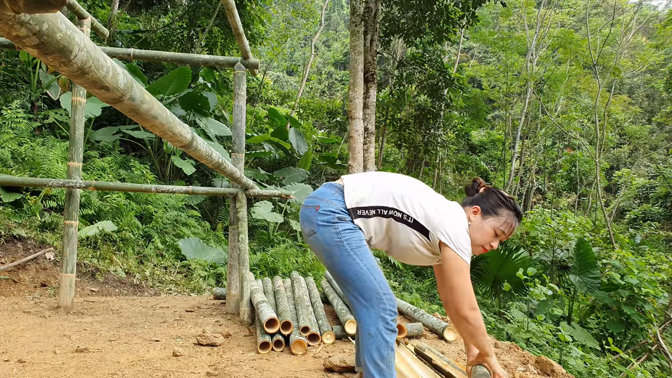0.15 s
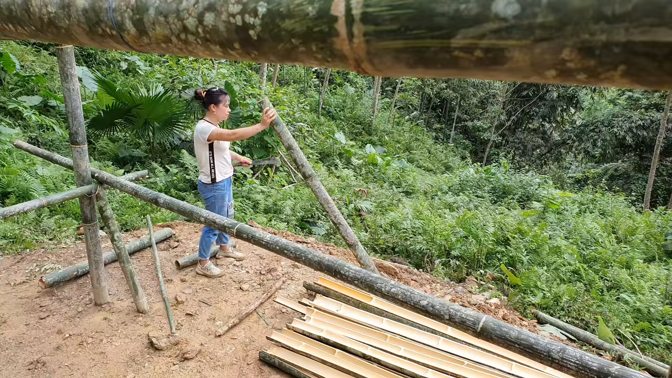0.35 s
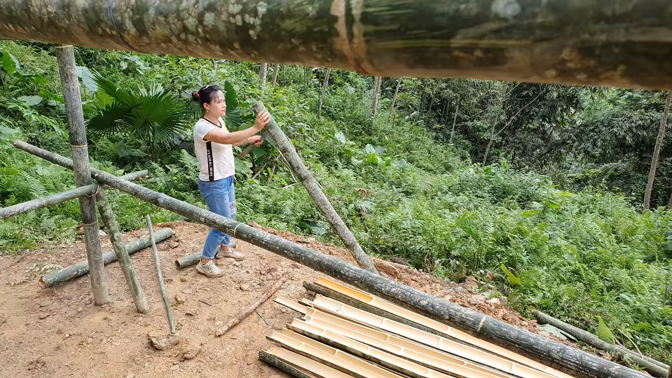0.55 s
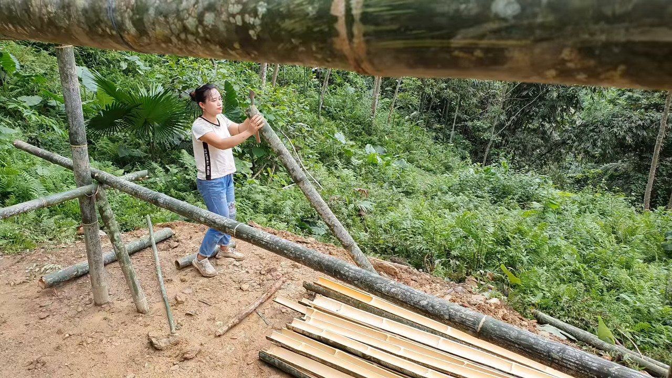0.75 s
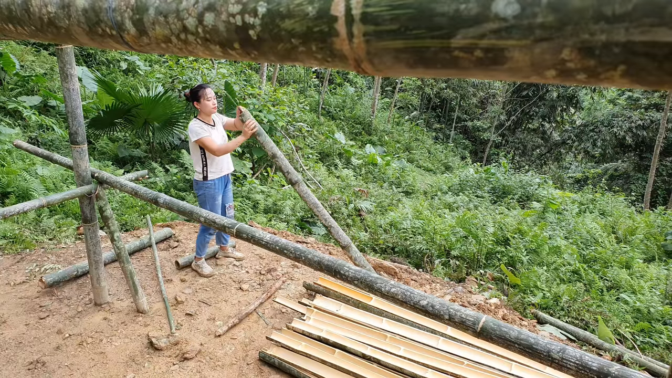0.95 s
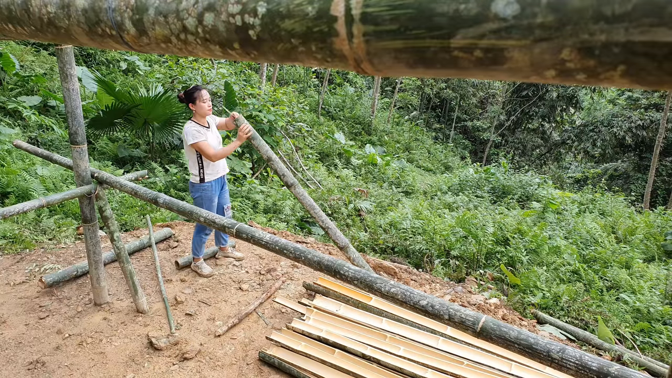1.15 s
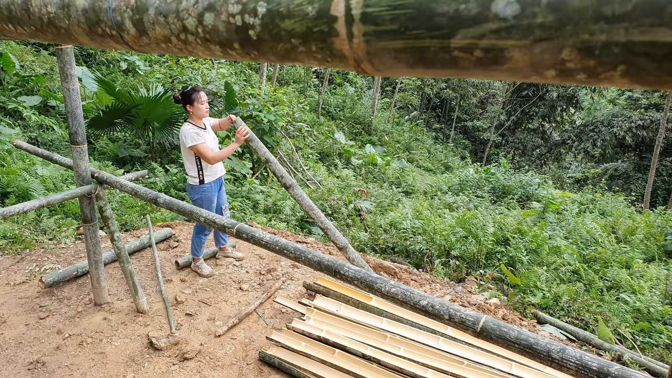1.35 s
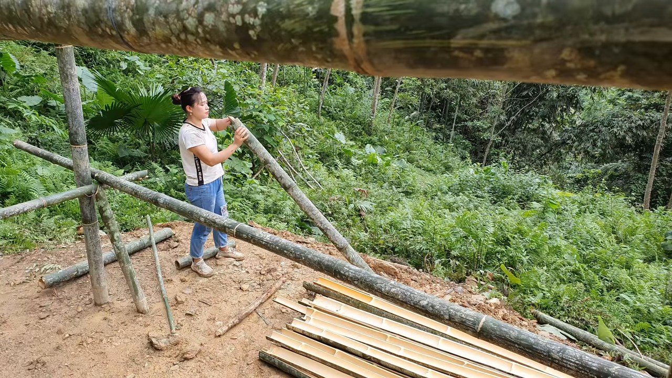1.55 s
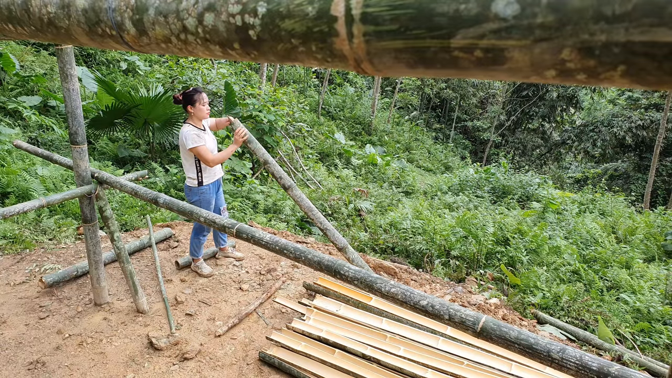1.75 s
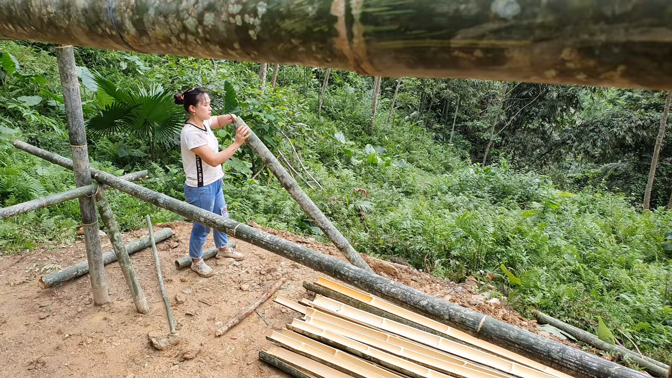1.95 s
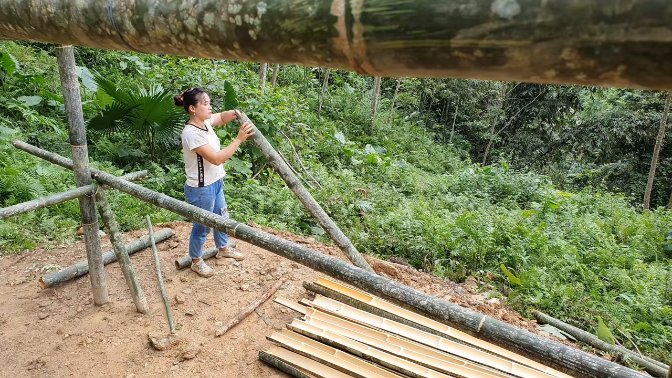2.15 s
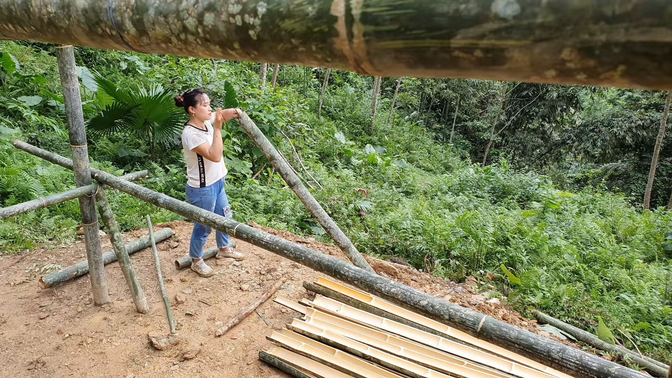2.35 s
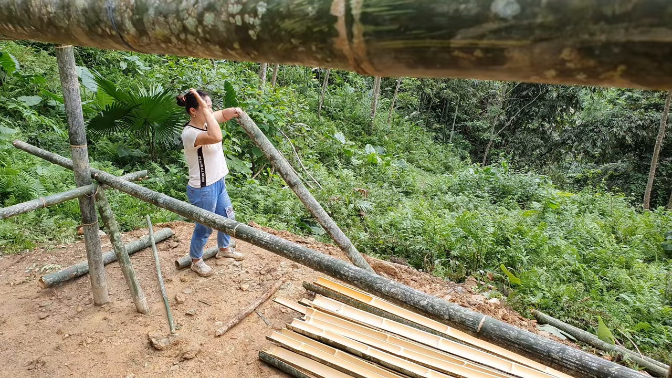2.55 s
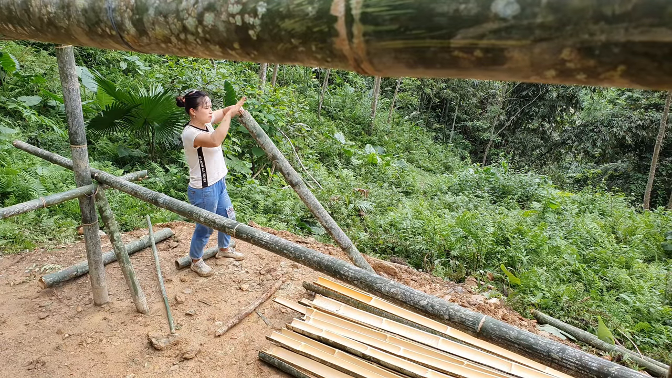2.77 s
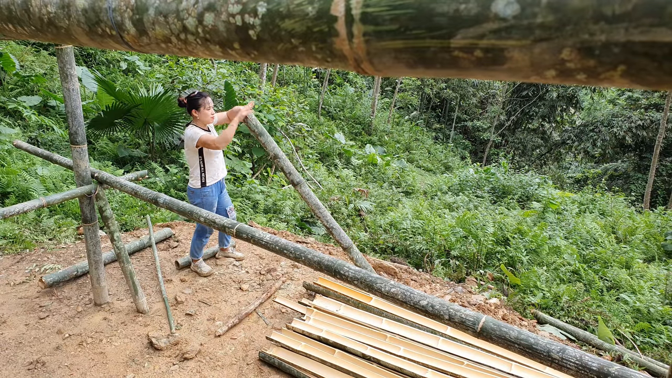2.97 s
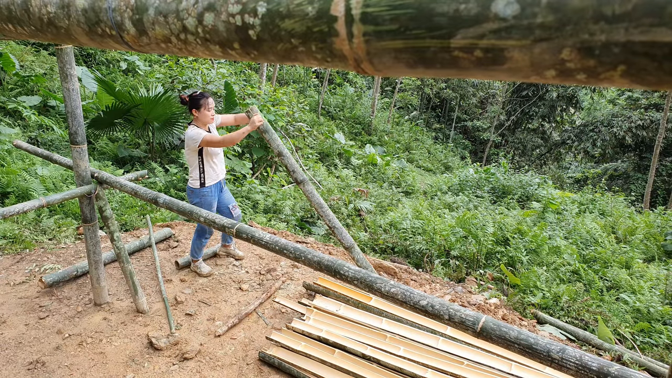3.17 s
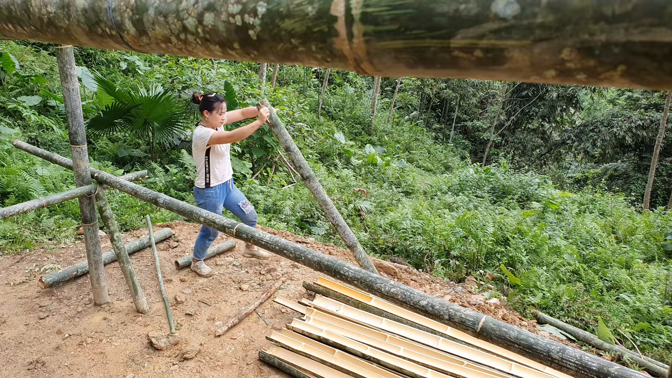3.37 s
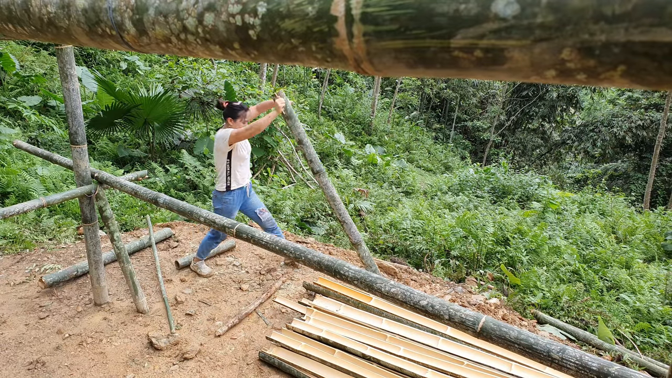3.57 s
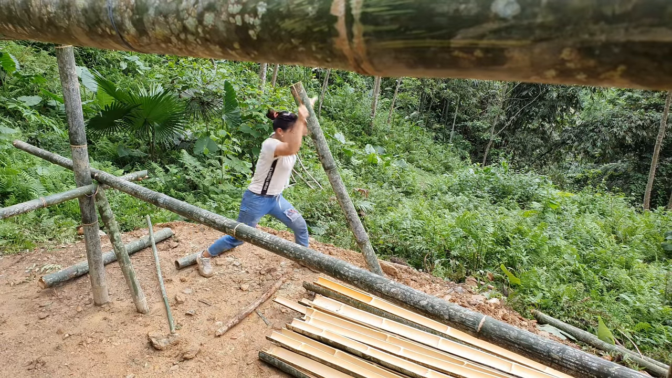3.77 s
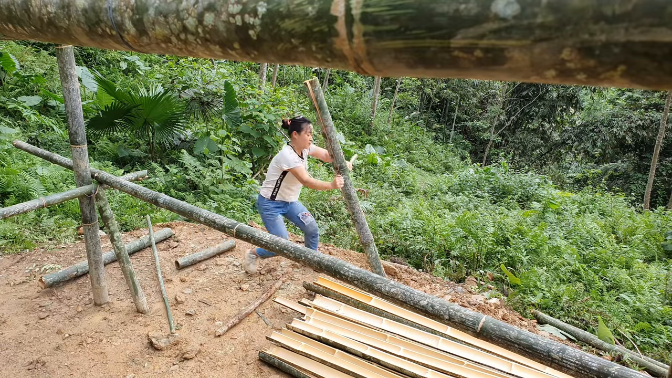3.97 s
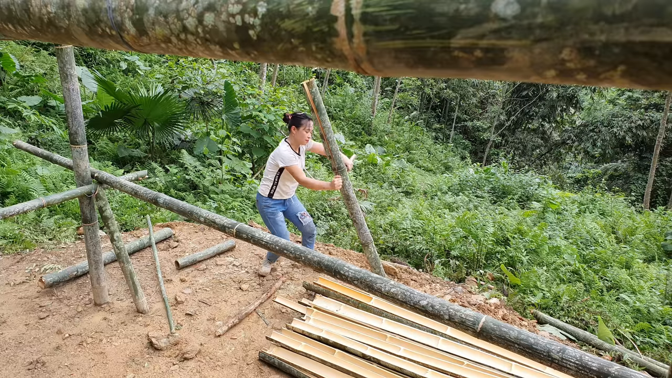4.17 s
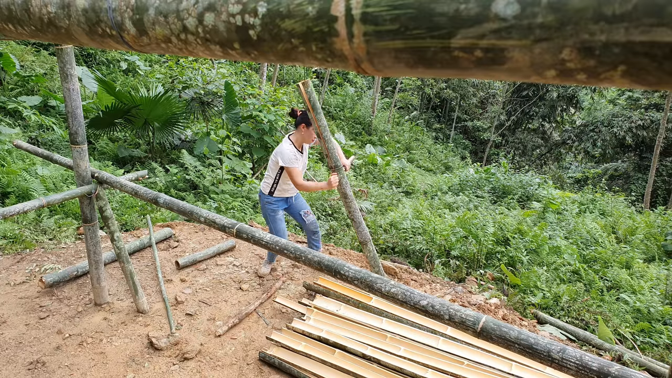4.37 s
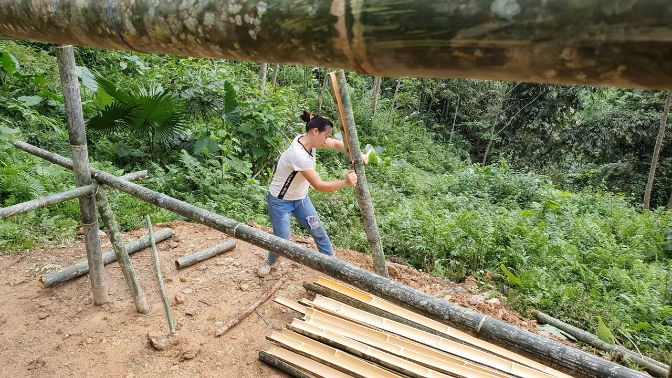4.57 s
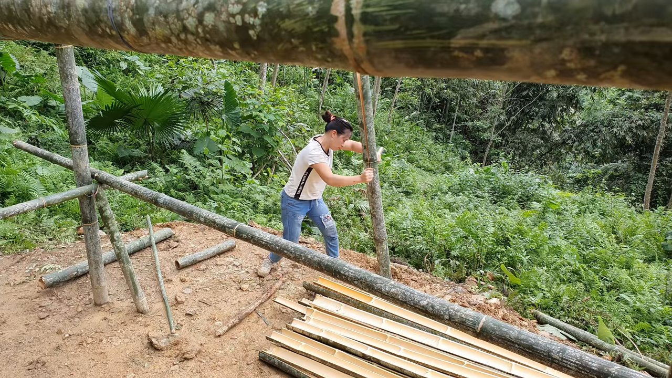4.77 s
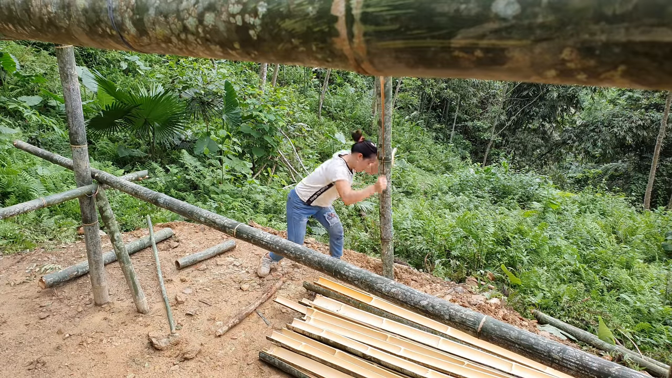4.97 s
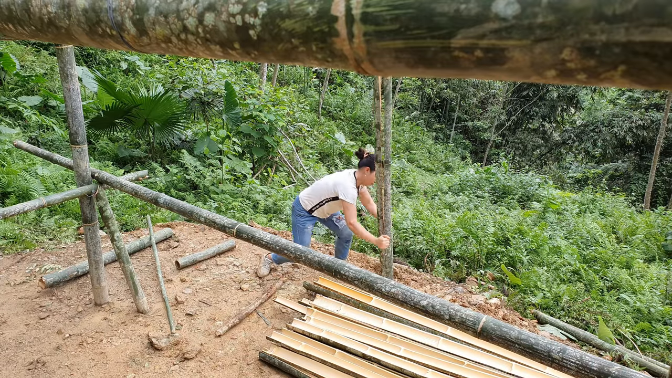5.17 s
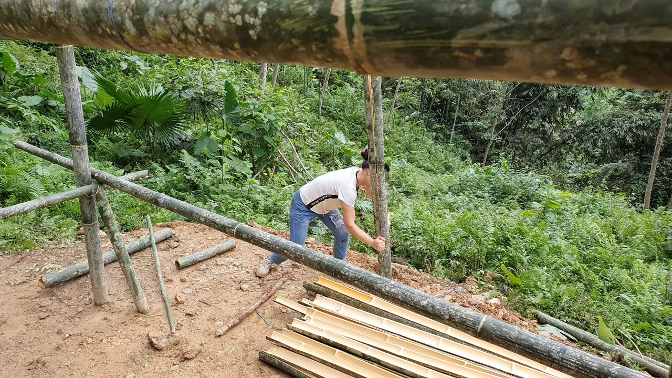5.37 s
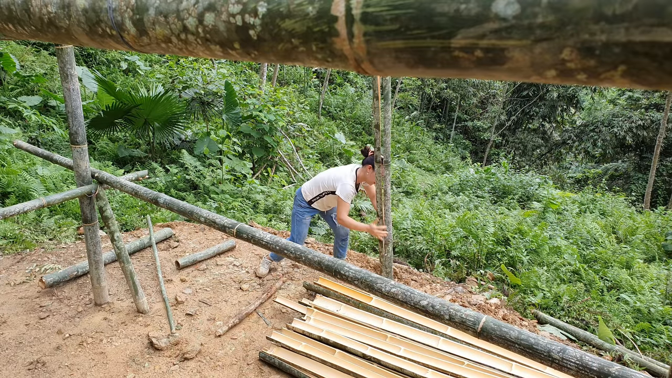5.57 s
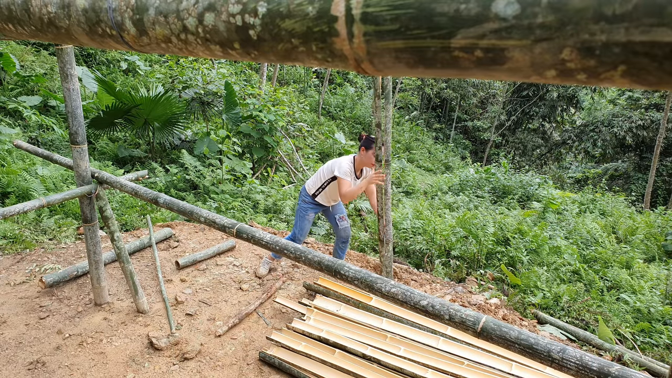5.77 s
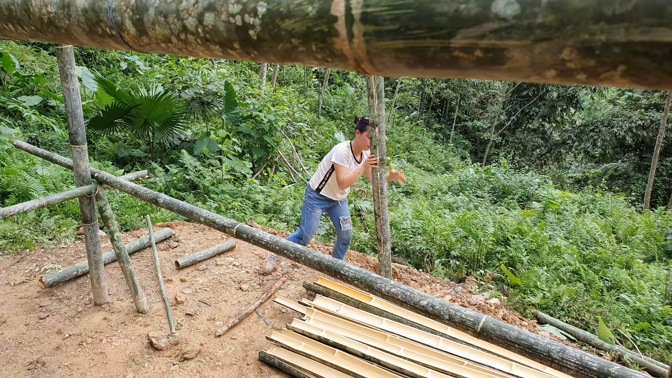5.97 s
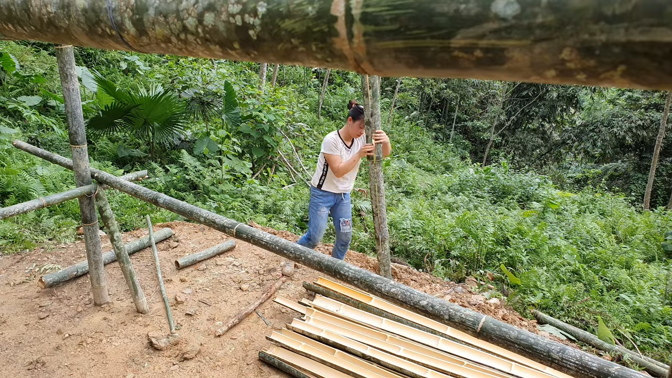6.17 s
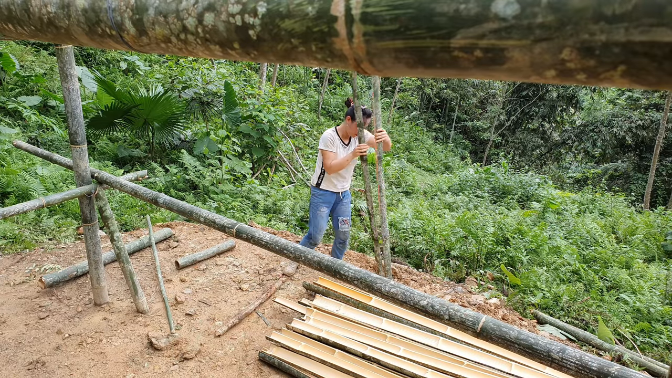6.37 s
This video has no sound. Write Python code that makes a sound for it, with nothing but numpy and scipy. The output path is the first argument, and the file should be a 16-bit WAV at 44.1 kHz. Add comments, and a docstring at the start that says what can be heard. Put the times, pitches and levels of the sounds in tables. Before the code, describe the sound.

A sharp, nearby clatter of bamboo poles opens, with two lighter clicks just after. Faint dull footsteps and brief hollow scrapes lead to two heavy thuds about a second apart, as a pole is driven into crunchy soil a little way from the microphone. Softer knocks trail off as it settles. The surrounding trees scatter the thuds back, and a quiet, high buzz of crickets and insects continues throughout.

```python
"""Two crickets and a chorus of insects buzz on a wooded slope. A bamboo pole clatters off a pile, footsteps
and pole thump dully on the ground, and a thin cane taps twice. The pole's hollow tube rings as it is
stood on end. It is rammed twice into a post hole, near 4 s and 5 s: its foot scrapes through gritty soil
and lands with a thud. A few light bumps follow. Throughout, the trees scatter the pole's sounds back."""
import sys
import numpy as np
from scipy import signal
from scipy.fft import rfft, irfft, next_fast_len
from scipy.io import wavfile
from scipy.ndimage import uniform_filter1d

SR = 44100
rng = np.random.default_rng(int(sys.argv[2]) if len(sys.argv) > 2 else 0)


def output_pcm(signal):
    """Save a mono or channel-first signal as 16-bit PCM at the path in sys.argv[1].

    Samples are clipped to [-1, 1] before scaling.
    """
    pcm = np.clip(np.atleast_2d(signal).T, -1, 1) * 32767
    wavfile.write(sys.argv[1], SR, np.round(pcm).astype(np.int16))


N = 283122
TIME = np.arange(N) / SR
AGE = np.arange(int(.8 * SR)) / SR  # seconds into a one-shot


def undb(db):
    """Decibels to gain."""
    return 10 ** (np.asarray(db) / 20)


def unit(x):
    """Scale to an rms of one."""
    return x / np.sqrt(np.mean(x ** 2))


def fade(t60, t=AGE):
    """Exponential decay, 60 dB down after t60 seconds."""
    return np.exp(-np.log(1000) * t / t60)


def walk(rate, size):
    """Smooth random drift with a spread near one."""
    hold = max(int(SR / rate), 1)
    stairs = np.repeat(rng.standard_normal(size // hold + 1), hold)
    return 1.6 * uniform_filter1d(stairs, hold)[:size]


def eq_gain(points, hz):
    """Gain of an EQ curve at the given frequencies."""
    f, db = np.transpose(points)
    return undb(np.interp(np.log(hz + 1), np.log(f), db))


def add(track, s, sound):
    """Mix a sound into a track at s seconds."""
    start = max(int(s * SR), 0)
    track[:, start:start + sound.shape[1]] += sound[:, :N - start]


# stereo width of scattered sound: f/Hz, side over mid/dB
STEREO_WIDTH = [(60, -19.5), (250, -12), (740, -10), (1100, -1.5), (2500, -2), (8000, 2.5), (15000, -1.5)]
def noise(spectrum, size, source=None):
    """Coloured stereo noise at unit rms: narrow in the bass, wide in the treble."""
    source = rng.standard_normal((2, size)) if source is None else source
    order = next_fast_len(size)
    hz = np.fft.rfftfreq(order, 1 / SR)
    mid, side = irfft(rfft(source, order) * eq_gain(spectrum, hz), order)[:, :size]
    side = irfft(rfft(side, order) * eq_gain(STEREO_WIDTH, hz), order)[:size]
    return unit(np.array([mid + side, mid - side]))


def ring(modes, pitch, gains, crest_s=0):
    """Damped modes, lined up at the crest of the blow; higher ones reach the two sides out of step."""
    out = 0
    for (hz, db, t60), gain in zip(modes, gains):
        skew = np.arctan(eq_gain(STEREO_WIDTH, hz)) * rng.choice([-1, 1]) * np.array([[1], [-1]])
        out = out + gain * undb(db) * fade(t60) * np.sin(2 * np.pi * hz * pitch * (AGE - crest_s) + skew)
    return out


def pulsing_cricket(hz=7435, pulse_s=.0054, droop_hz=35, waver_hz=25, between=.13):
    """One wing stroke after another, each a short, nearly pure and slightly falling tone."""
    period, first_s = 1 / 25, .022
    offset = (TIME - first_s + period / 2 + .0007 * walk(3.2, N)) % period - period / 2
    stroke = np.exp(-(offset / pulse_s) ** 2) * undb(1.7 * walk(25, N))
    pitch = hz - droop_hz * np.tanh(offset / pulse_s) + waver_hz * walk(200, N)
    phase = 2 * np.pi * np.cumsum(pitch) / SR
    return unit(np.array([(stroke + between * walk(120, N)) * np.sin(phase + lag) for lag in (0, 1.3)]))


def chirping_cricket(top_hz=6100, sweep_hz=1000, left_gain=.65):
    """Chirps of six quick strokes, each sweeping downwards, at a slightly uneven pace."""
    period, first_s, stroke_s, strokes, uneven = .1396, .066, .0102, 6, .05
    cycle = (TIME - first_s) / period + uneven * walk(2, N)
    count = cycle % 1 * period / stroke_s
    envelope = np.sin(np.pi * count) ** 2 * (count < strokes) * (.72 + .33 * count / strokes)
    pitch = top_hz - sweep_hz * (count % 1) + 110 * walk(300, N)
    phase = 2 * np.pi * np.cumsum(pitch) / SR
    return unit(np.array([left_gain * envelope * np.sin(phase), envelope * np.sin(phase + 2.2)]))


# fader rides of the ambience: t/s, bed level/dB, pulsing cricket level/dB
AMBIENCE_RIDES = [(0.0, -55, -63), (0.64, -68, -74), (0.97, -68, -74), (2.23, -56, -62), (3.65, -56, -62),
                  (3.97, -53, -59), (4.29, -61, -67), (6.42, -59, -67)]
# sizzle of the far insects: f/Hz, level/dB
CHORUS_EQ = [(3300, -37), (3900, -13), (4350, -7), (4850, -9.5), (5400, -2.5), (5950, -5), (6500, -16.5),
             (7050, -6), (7450, 5.5), (7900, -7), (8500, -8), (8900, -15), (9850, -2.5), (10800, -25.5),
             (15500, -30.5)]
# low wash of moving air: f/Hz, level/dB
AIR_EQ = [(15, -42), (25, -13), (54, -8), (182, -6), (299, -8), (345, -2.5), (416, -10), (742, -3),
          (992, -13.5), (1500, -11), (3500, -21), (4550, -53), (7700, -120)]
def hillside(chorus_db=1.5, chirp_db=-5, pulse_db=3, air_db=-13, flicker_db=.5, right_db=4):
    """Two near crickets and a blur of far insects, mostly from the brush on the right, over faint air."""
    s, *rides = np.transpose(AMBIENCE_RIDES)
    bed_fader, pulse_fader = (undb(np.interp(TIME, s, ride)) for ride in rides)
    chorus = noise(CHORUS_EQ, N) * undb(chorus_db + flicker_db * walk(140, N))
    air = bed_fader * noise(AIR_EQ, N) * undb(air_db + walk(6, N))
    chirps = undb(chirp_db) * chirping_cricket()
    pulses = undb(pulse_db) * pulsing_cricket()
    pan = undb(np.array([[-right_db], [right_db]]) / 2)
    return (bed_fader * (chorus + chirps) + pulse_fader * pulses) * pan + air


# hits of the pole against the pile: t/s, level/dB, treble shelf/dB
PILE_HITS = [(.006, -39.5, 0), (.062, -46, 1), (.0935, -20.5, 1.5), (.1005, -15.2, -2.5),
             (.123, -20.5, -13), (.152, -26.5, -4.5), (.205, -41.5, -16), (.25, -51, 1), (.381, -45.5, -12)]
# wall modes of the piled poles: f/Hz, level/dB, t60/s
PILE_WALLS = [(556, -10, .08), (825, -1, .1), (922, -3, 0.21), (1124, -0.5, 0.11), (1327, -5, 0.14),
              (1774, -9, .1), (2176, -11, 0.044), (2870, -9.5, 0.044)]
# woody clack of the rattle: f/Hz, level/dB
CLACK_EQ = [(50, -24), (220, -13), (330, -19), (550, -2.5), (850, -5), (1600, -7.5), (3200, -14),
            (6000, -21), (10000, -30), (15000, -41)]
def pile_clatter(treble_hz=2200, ring_db=-6.5, pitch_scatter=.022, crack_t60=.068, t60_per_db=.0068):
    """Hard knocks: the tube walls ring and the neighbouring poles rattle."""
    out = np.zeros((2, N))
    hardest_db = max(row[1] for row in PILE_HITS)
    polarity = (-1) ** np.arange(len(PILE_WALLS))
    for s, db, treble_db in PILE_HITS:
        # the hardest knock is a dry crack; lighter ones leave the pile rattling for longer
        rattle = noise(CLACK_EQ, len(AGE)) * fade(crack_t60 + t60_per_db * (hardest_db - db))
        treble = signal.sosfilt(signal.butter(1, treble_hz, "high", fs=SR, output="sos"), rattle)
        walls = ring(PILE_WALLS, 1 + pitch_scatter * rng.standard_normal(), polarity)
        add(out, s, undb(db) * (rattle + (undb(treble_db) - 1) * treble + undb(ring_db) * walls))
    return out


# dull low thumps on the ground, from footsteps and the pole: t/s, level/dB
THUMPS = [(.01, -61), (.259, -55), (2.328, -63), (3.188, -52), (3.308, -61), (3.366, -52.5), (4.071, -60)]
# low-end weight of the ground: f/Hz, level/dB
GROUND_EQ = [(20, -5), (48, -5), (75, -5), (130, -22.5), (300, -32), (1000, -66)]
def ground_thumps(press_s=.016, knock_db=-40, ring_db=-20, landing_db=-44):
    """Dull pushes on the ground from the feet and from the pole's knocks, rings and landings."""
    out = np.zeros((2, N))
    push = AGE / press_s * np.exp(1 - AGE / press_s)
    layers = (THUMPS, 0), (PILE_HITS, knock_db), (TUBE_HITS, ring_db), (LANDINGS, landing_db)
    for cues, trim_db in layers:
        for s, db, *_ in cues:
            add(out, s, undb(db + trim_db) * noise(GROUND_EQ, len(AGE)) * push)
    return out


# two taps of a thin cane: t/s, level/dB
CANE_HITS = [(0.4042, -28.5), (.4385, -31.5)]
# wall modes of the cane: f/Hz (before tuning), level/dB, t60/s
CANE_WALLS = [(802, -9.5, 0.066), (1133, -5, 0.058), (1249, -4, 0.076), (1824, -15, .06),
              (2450, -12, 0.074), (2570, -6, 0.035), (2830, -9, 0.043), (3060, -9, 0.044)]
# bright tick of the contact: f/Hz, level/dB
TICK_EQ = [(100, -18), (500, -14), (800, -4), (1200, -3), (1700, -8), (2800, -6), (4200, -11), (7000, -17),
           (15000, -35)]
def cane_taps(contact_s=.0017, tick_db=-7, tick_t60=.092, tuning=.97):
    """A lighter, higher clack: a tick of contact and a short hollow ring from the walls."""
    out = np.zeros((2, N))
    polarity = (-1) ** np.arange(len(CANE_WALLS))
    for s, db in CANE_HITS:
        tick = undb(tick_db) * noise(TICK_EQ, len(AGE)) * fade(tick_t60)
        walls = ring(CANE_WALLS, tuning, polarity)
        add(out, s, undb(db) * (tick + walls) * (1 - np.exp(-AGE / contact_s)))
    return out


# the pole shifting and catching: t/s, level/dB, upper mode trim/dB, catch spacing/s
TUBE_HITS = [(1.503, -59, -21, .02), (2.73, -37, -2, .0091), (3.034, -43.5, 2.5, .035)]
# one bending mode, the air column's odd series, then wall modes: f/Hz, level/dB, t60/s
TUBE_PARTIALS = [(145.7, 4, 0.59), (392, -15, .25), (659, 16.5, 0.13), (960, 8, 0.13), (1150, -6, .12),
                 (1490, 4, 0.11), (2040, 2.5, .08), (2665, 5, 0.086), (3170, -2.5, 0.054),
                 (3806, -7.5, 0.098), (4400, 6, 0.1)]
def tube_rings(build_s=.014, catch_s=.004, catch_db=-3.5, catches=2):
    """The long pole bends and its air column sounds; further catches ring only the upper modes."""
    out = np.zeros((2, N))
    is_upper = np.arange(len(TUBE_PARTIALS)) > 0
    for s, db, upper_db, spacing_s in TUBE_HITS:
        body = ring(TUBE_PARTIALS, 1, undb(upper_db * is_upper)) * (1 - np.exp(-AGE / build_s))
        add(out, s, undb(db) * body)
        for k in range(1, catches + 1):
            catch = ring(TUBE_PARTIALS, 1, is_upper) * (1 - np.exp(-AGE / catch_s))
            add(out, s + k * spacing_s, undb(db + upper_db + k * catch_db) * catch)
    return out


# crunch of the soil: f/Hz, level/dB
GRIT_EQ = [(60, -19), (200, -5), (700, -10), (1300, 3.5), (1900, -1.5), (3200, -1), (5200, -6), (7500, -9),
           (11000, -12), (15500, -22)]
def grit(grain_db=1.5):
    """Crushed soil: a dense run of grains of uneven size."""
    sizes = undb(grain_db * np.clip(walk(1500, len(AGE)), -2, 2))
    return noise(GRIT_EQ, len(AGE), rng.standard_normal((2, len(AGE))) * sizes)


# the pole's foot sliding: t/s, length/s, rasp level/dB, grit level/dB, swell/dB, air gap f/Hz
SLIDES = [(2.726, .033, -33, -27.5, 0, 195), (3.03, .088, -29.5, -29, -8, 205),
          (3.845, .096, -26.5, -27.5, 1.5, 290), (3.975, .066, -27, -38, -11, 315),
          (4.532, .08, -43, -43, -6, 320), (5.071, .074, -35.5, -38.5, 7, 355),
          (5.197, .09, -42.5, -38, -6, 240), (5.567, .052, -39, -43.5, -9, 355)]
# hollow rasp through the tube: f/Hz, level/dB
RASP_EQ = [(150, -40.5), (330, -14.5), (430, -13), (520, -4.5), (610, -7.5), (700, -2.5), (790, -3.5),
           (930, -12.5), (1200, -19.5), (1900, -25.5), (4000, -43.5)]
def soil_scrapes(grip_s=.007, judder_db=1.46, gap_waver=.05, gap_rise_per_s=1.8):
    """Soil sticks and slips, rasping through the tube; the air gap round the foot rises in pitch."""
    snug_hz, snug_db, gap_db_per_octave = 290, -4, 18
    run_on_t60, run_on_per_s = .025, .75
    rim_s, rim_db = .028, -17
    out = np.zeros((2, N))
    for s, length, rasp_db, grit_db, swell_db, gap_hz in SLIDES:
        travel = np.minimum(AGE / length, 1) - .5
        # loose soil runs on for longer after a longer slide
        release_t60 = run_on_t60 + run_on_per_s * length
        force = (1 - np.exp(-AGE / grip_s)) * fade(release_t60, np.maximum(AGE - length, 0))
        force *= undb(swell_db * travel + judder_db * walk(160, len(AGE)))
        hz = gap_hz * (1 + gap_rise_per_s * length * travel) * (1 + gap_waver * walk(150, len(AGE)))
        gap_tone = unit(np.sin(2 * np.pi * np.cumsum(hz) / SR) * (1 + .93 * walk(110, len(AGE))))
        # a narrower, higher gap speaks louder, up to the pitch of a snug fit
        gap_db = rasp_db + snug_db + gap_db_per_octave * min(np.log2(gap_hz / snug_hz), 0)
        rasp = undb(rasp_db) * noise(RASP_EQ, len(AGE))
        add(out, s, force * (rasp + undb(grit_db) * grit() + undb(gap_db) * gap_tone))
        if swell_db > 0:  # a stroke that gathers speed brushes the rim just before it grips
            envelope = np.minimum(AGE / rim_s, 1) * fade(release_t60, np.maximum(AGE - rim_s, 0))
            brush = noise(RASP_EQ, len(AGE)) + gap_tone + grit() / 2
            add(out, s - rim_s, undb(rasp_db + rim_db) * envelope * brush)
    return out


# body of pole and hole together: f/Hz (at pitch ratio 1), level/dB, t60/s
HOLE_MODES = [(112.9, -10.5, 0.063), (167.8, -9.5, 0.047), (213.7, -0.5, 0.075), (249, 0.5, 0.037),
              (308, -2, 0.12), (508, -5, .08), (604.3, -2, 0.074), (682, 1, 0.071), (734, -4, .05),
              (811, -11, 0.083), (1124, -20, .12), (1401, -18, 0.11)]
def thud(db, pitch, bass_db, crunch_db, bass_edge_hz=420, give_s=.0044, give_s_per_db=.00007):
    """The soil gives way for a moment, crunches, and the pole answers with a short hollow note."""
    is_bass = np.array(HOLE_MODES)[:, 0] < bass_edge_hz
    note = ring(HOLE_MODES, pitch, undb(bass_db * is_bass), crest_s=.004175)
    knock = undb(-14) * noise(RASP_EQ, len(AGE)) * fade(t60=.2)
    crunch = undb(crunch_db) * grit() * fade(t60=.094)
    attack_s = give_s + give_s_per_db * abs(db)  # lighter landings sink in more slowly
    return undb(db) * ((note + knock) * (1 - np.exp(-AGE / attack_s)) + crunch)


# the pole's foot hitting soil: t/s, level/dB, pitch ratio, bass trim/dB, crunch trim/dB
LANDINGS = [(3.478, -48, 1.21, -25, -22), (3.85, -14.5, 1.02, -8.5, -10), (3.9425, -3.3, .99, -15, -14),
            (4.015, -21.5, 1.04, -4, -20), (4.53, -28.5, 1.01, -15, -3), (4.741, -55, 1.3, 2, -30),
            (5.155, -6.2, 1.01, -2.3, -7.5), (5.195, -26, 1.1, 5.5, -15), (5.642, -36.5, 1.14, 0, -21),
            (5.947, -49, .92, -8, -21), (6.302, -39.5, 1.09, 2.5, -28), (6.33, -43, .84, -5, -22)]
def pole_landings(settle_s=.021, settle_db=-22.5, settle_pitch=.82, settle_bass_db=4):
    """The foot lands, then settles with a second, weaker and deeper thud."""
    out = np.zeros((2, N))
    for s, db, pitch, bass_db, crunch_db in LANDINGS:
        add(out, s, thud(db, pitch, bass_db, crunch_db))
        add(out, s + settle_s, thud(db + settle_db, pitch * settle_pitch, settle_bass_db, crunch_db))
    # a high-pass keeps sub-bass rumble out of the thuds
    return signal.sosfilt(signal.butter(2, 55, "high", fs=SR, output="sos"), out)


# reverb bands of the wood: f/Hz, level/dB, t60/s
REVERB_BANDS = [(100, 0, 0.79), (280, -1, .8), (646, -4, 1.156), (1300, -5.5, 0.98), (3000, 4.5, 0.75),
                (7000, 1, .7), (13280, 7, 0.49)]
def tree_reverb(send, onset_s=.021, tail_s=1.4):
    """Trunks and leaves scatter a diffuse tail that dies sooner in the treble."""
    t = np.arange(int(tail_s * SR)) / SR
    size = next_fast_len(len(t))
    hz = np.fft.rfftfreq(size, 1 / SR)
    scatter = rfft(noise([(20, 0), (20000, 0)], len(t)), size)
    log_centres = np.log(np.array(REVERB_BANDS)[:, 0])
    tail = 0
    for (_, db, t60), solo in zip(REVERB_BANDS, np.eye(len(REVERB_BANDS))):
        crossover = np.interp(np.log(hz + 1), log_centres, solo)
        band = irfft(scatter * crossover, size)[:, :len(t)]
        tail = tail + undb(db) * fade(t60, t) * band
    tail *= 1 - np.exp(-(t / onset_s) ** 2)
    return signal.fftconvolve(send, tail / np.sqrt(np.sum(tail ** 2) / 2), axes=1)[:, :N]


def scene(pile_send_db=-27, scrape_send_db=-12.5, thud_send_db=-13, tube_send_db=-18):
    """The pile sounds dry, with only a faint tail from the trees; the post hole's sounds carry more of the
    trees' answer."""
    knocks = pile_clatter() + cane_taps()
    scrapes, thuds, rings = soil_scrapes(), pole_landings(), tube_rings()
    reverb = tree_reverb(undb(pile_send_db) * knocks + undb(scrape_send_db) * scrapes
                         + undb(thud_send_db) * thuds + undb(tube_send_db) * rings)
    return knocks + scrapes + thuds + rings + ground_thumps() + reverb + hillside()


def record(dry):
    """Master chain: soft saturation rounds the highest peaks and a steep low-pass cuts the top."""
    headroom, top_hz = 1.3, 16000
    rounded = headroom * np.tanh(dry / headroom)
    return signal.sosfilt(signal.ellip(8, .2, 70, top_hz, fs=SR, output="sos"), rounded)


dry = scene()
out = record(dry)
output_pcm(out)
```